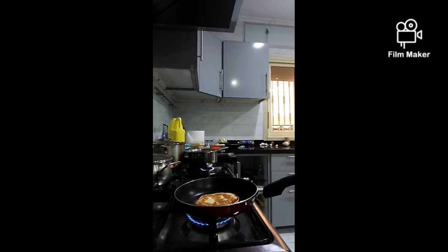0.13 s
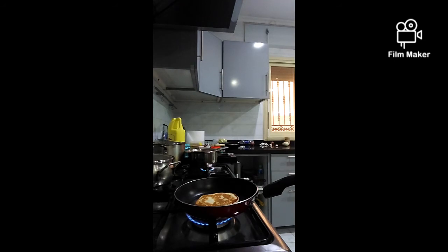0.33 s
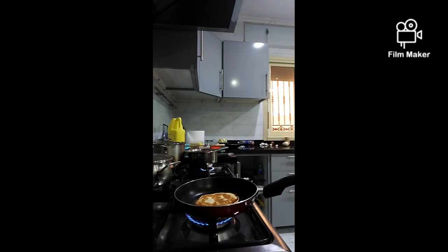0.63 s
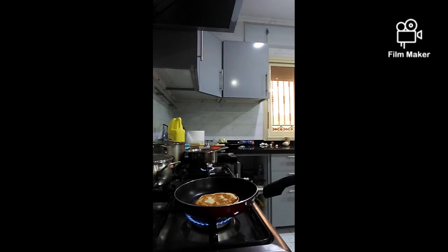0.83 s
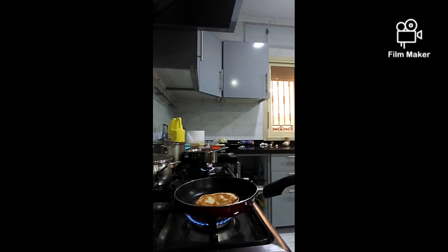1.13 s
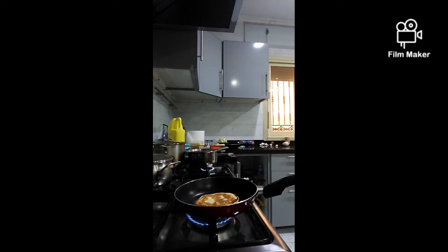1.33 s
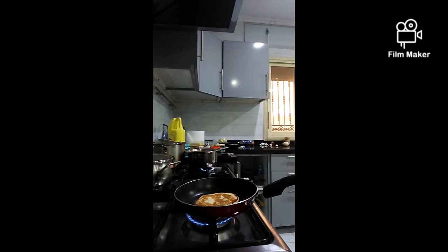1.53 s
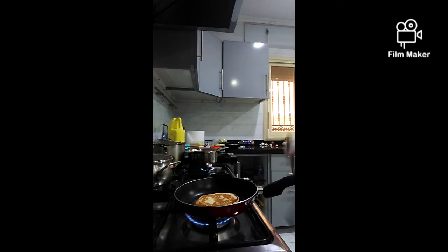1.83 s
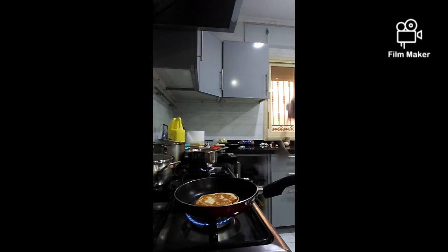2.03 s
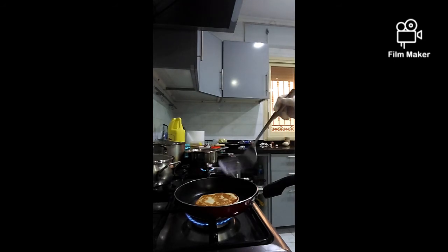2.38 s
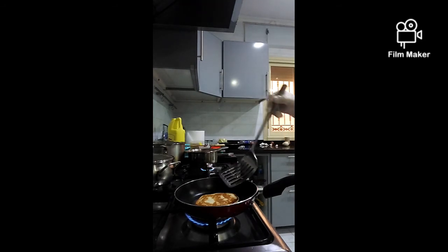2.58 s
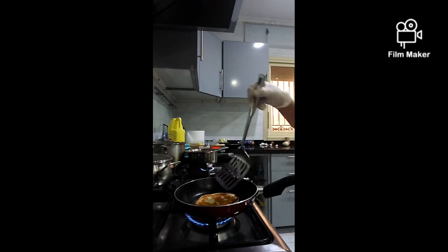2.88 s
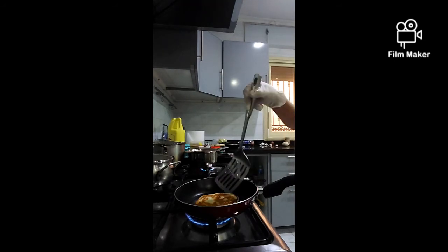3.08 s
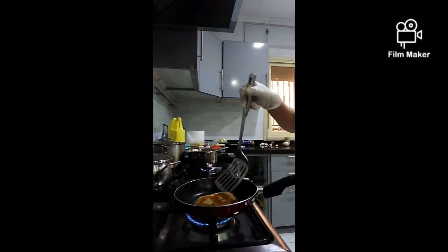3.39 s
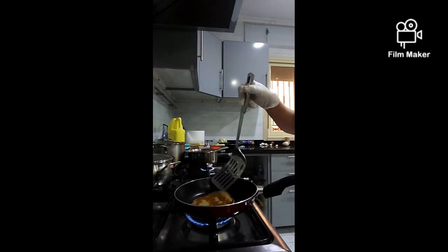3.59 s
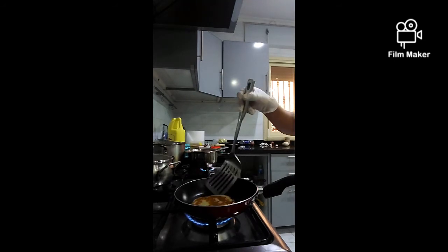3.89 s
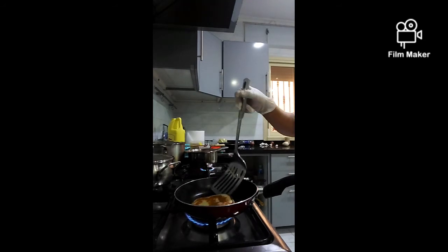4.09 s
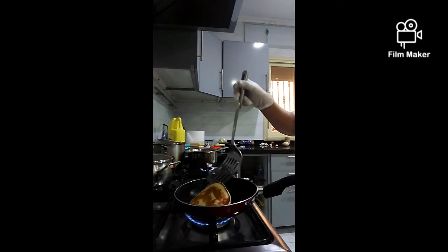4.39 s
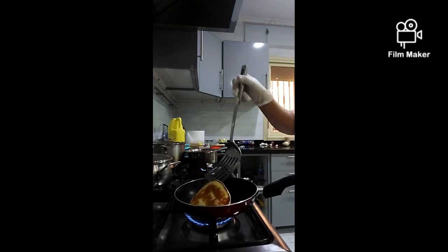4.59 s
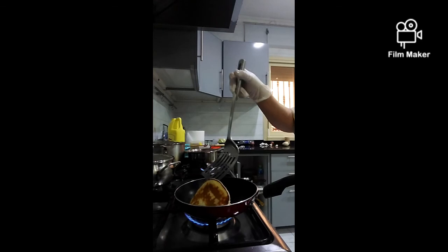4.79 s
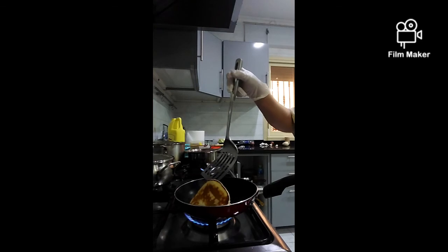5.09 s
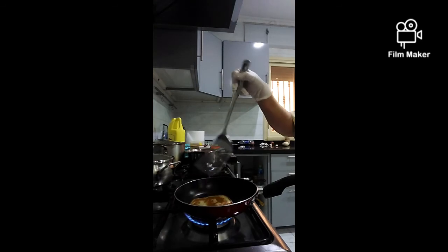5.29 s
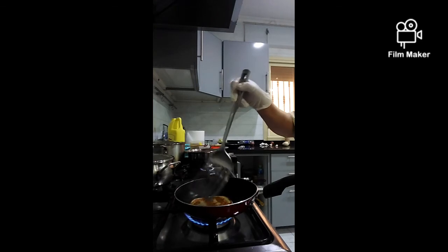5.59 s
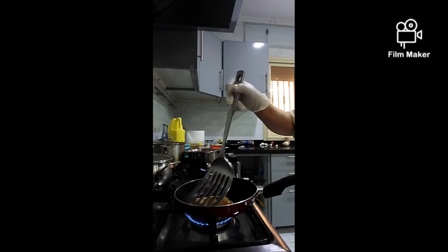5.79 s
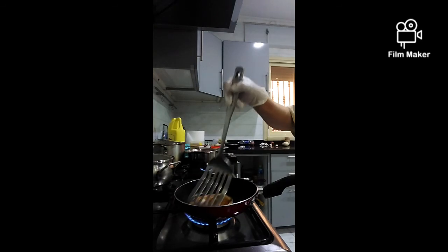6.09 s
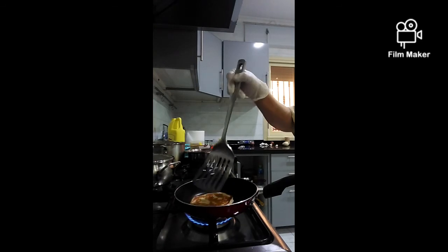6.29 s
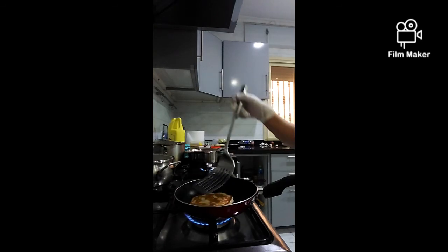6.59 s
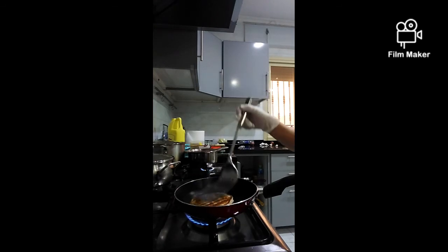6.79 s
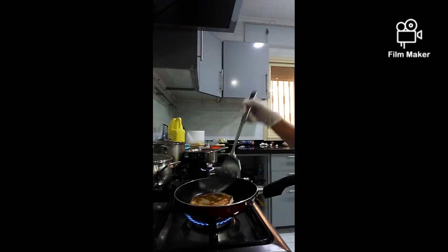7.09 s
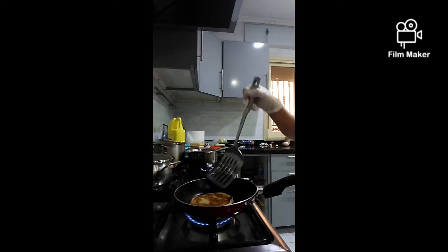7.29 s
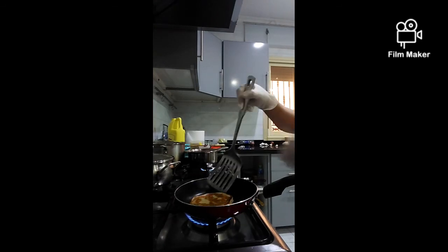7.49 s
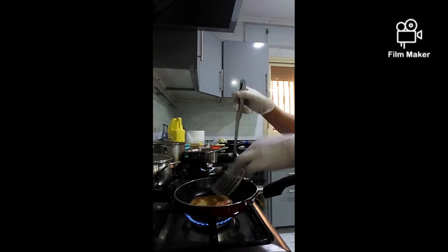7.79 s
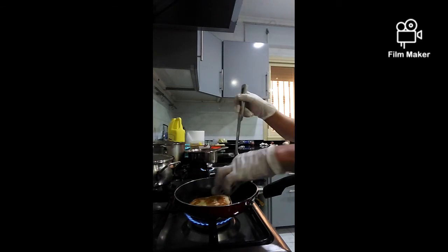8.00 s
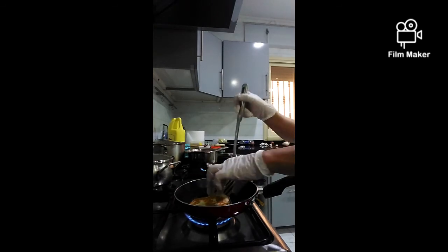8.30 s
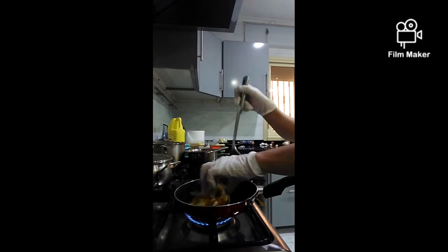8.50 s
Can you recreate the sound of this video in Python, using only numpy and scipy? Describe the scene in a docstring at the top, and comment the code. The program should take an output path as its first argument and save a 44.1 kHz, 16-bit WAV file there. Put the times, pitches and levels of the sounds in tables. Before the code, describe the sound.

A deep, slightly wavering extractor drone dominates, with faint frying hiss beneath. A metal spatula knocks a thin pan in small groups, its ring quickly damped, with one short squeak at about four seconds. A complete half-second dropout follows. Afterwards come a few light contacts, a long stretch of hum, then quick knocks and scrapes as fat flares into a crisp hiss. Heard close by on a phone in a hard-walled little kitchen.

```python
"""A cooker hood roars over a faint simmer of fat in a small tiled kitchen while a pancake fries.
The hood is turbulent noise shaped by resonances; the fat is a dense random train of bursting bubbles.
A slotted steel turner then taps, squeaks on and scrapes the pan: blows and slips excite decaying modes.
Fat sizzles up at the end. A phone close by hears all this through two unequal ports, and goes silent
for about half a second in the middle."""
import sys
import numpy as np
from scipy import signal
from scipy.fft import rfft, irfft, next_fast_len
from scipy.io import wavfile
from scipy.ndimage import uniform_filter1d

SR = 44100
rng = np.random.default_rng(int(sys.argv[2]) if len(sys.argv) > 2 else 0)


def dump_mix(stems):
    """Bounce the given channels to the path in sys.argv[1] as a 16-bit WAV at rate SR."""
    frames = np.atleast_2d(stems).T  # one column per channel
    limited = np.clip(frames, -1, 1)  # hard clip at full scale
    pcm = np.round(limited * 32767).astype(np.int16)
    wavfile.write(sys.argv[1], SR, pcm)


N = 380583  # samples
SIZE = next_fast_len(N)
HZ = np.maximum(np.arange(SIZE // 2 + 1) * SR / SIZE, 1)  # frequency of each Fourier bin

# Kitchen and duct resonances rung by the hood's air noise.
# Each row: centre in Hz, width in Hz, relative peak level in dB.
RESONANCES = [(64, 7.3, -41.5), (95.9, 8.9, -39.5), (115.4, 13, -37.5), (126, 18.3, -34.5),
              (142.2, 9, -34.5), (171, 12, -59.5), (199.7, 9.6, -41), (226.4, 3.6, -43), (255.5, 23.2, -41),
              (298.5, 19.5, -41), (342, 16, -54.5), (399.7, 12, -48.5), (429, 61, -48.5),
              (472.3, 39.5, -46), (490, 14, -60), (527, 15, -52), (590.5, 7.9, -51.5), (610.3, 11, -52),
              (647, 76, -60), (705.2, 11.3, -51.5), (794.3, 23, -56), (972, 7, -58.5), (1054, 73, -62),
              (1544, 37, -70), (2312, 175, -70.5), (3393, 300, -78)]
# Broad air rush between the resonances. Each row: frequency in Hz, level in dB on the same relative scale.
AIR_RUSH = [(25, -78.5), (50, -57.5), (160, -61), (500, -56.5), (880, -65), (1300, -68.5), (1900, -74.5),
            (2900, -80.5), (4000, -81.5), (4600, -94), (7000, -101.5), (11000, -108), (16000, -114)]
# Correlation of left and right in the hood's sound. Each row: frequency in Hz, correlation from 0 to 1.
LIKENESS = [(150, .9995), (300, .99), (500, .97), (700, .85), (900, .5), (1500, .4), (3000, .25),
            (6000, .2)]
# Phase by which the hood's sound at the left port trails the right. Each row: frequency in Hz, lag in radians.
LEFT_LAG = [(100, 0), (430, .15), (780, .9), (1300, 2.6), (2400, 7), (16000, 20)]
HOOD_DB, HOOD_FLICKER_DB = -29, 1.51  # rms level; rms wavering of each octave band

# Fat simmering round the pancake. Each row: time in seconds, level in dB.
SIMMER_LEVEL = [(0.05, -69.5), (.7, -71), (1.7, -75), (3.25, -71), (4.4, -74.5), (5.7, -71.5), (6.02, -69),
                (6.5, -84.5), (7.4, -86)]
# Spectrum of the simmer. Each row: frequency in Hz, relative level in dB.
SIMMER_TONE = [(2500, -32), (4000, 2.5), (5500, -1), (8000, -4), (12000, -12), (16000, -14.5)]
# Fat flaring up under the turner. Each row: time in seconds, level in dB.
FLARE_LEVEL = [(7.62, -53.5), (7.8, -52), (7.97, -51), (8.1, -51), (8.2, -55), (8.32, -49), (8.47, -56),
               (8.6, -53)]
# Spectrum of the flare. Each row: frequency in Hz, relative level in dB.
FLARE_SPECTRUM = [(1200, -8), (2300, -4), (3200, -2), (4000, -6.5), (5000, -10.5), (6500, -11.5),
                  (8500, -16.5), (12000, -24), (16000, -23.5)]
SIMMER_FLICKER_DB, FLARE_FLICKER_DB = 2.5, 1.2  # rms
FLARE_STARTS_S, FLARE_SWELL_S = 7.575, .05
BUBBLES_PER_S, BUBBLE_SCATTER_DB = 1200, 1.5  # mean rate in each channel; mean excess over the smallest

# Modes of the pan. Each row: frequency in Hz, level in dB relative to its region, free t60 in seconds.
PAN_MODES = [(788, 0, .08), (885, -6, .07), (968, 0, .11), (1075, -2, .08), (1400, -12, .06),
             (1465, 0, .08), (1520, -4, .07), (1575, 0, .08), (1705, -7, .06), (1785, -6, .07),
             (2280, -4, .07), (2405, 0, .09), (2550, 0, .08), (2960, -7, .05), (3350, 0, .05),
             (3570, -1, .05), (3870, -7, .04)]
# Where a touch lands decides how strongly each region of modes answers. Each entry: region centre in Hz.
REGION_CENTRES_HZ = [788, 968, 1460, 1575, 2400, 2550, 3500]
MODE_SCATTER_DB, MODE_DETUNE = 1.5, .004  # standard deviations from touch to touch; detune is a share
RING_FREEDOM = .85  # share of the free ring time left under the blade
# Turner meets the pan. Each row: start in seconds, crack level in dB, crack tilt in dB per octave,
# chatter t60 in seconds, then ring level in dB in each of the seven regions.
BLOWS = [(2.564, -57, -2, .1, -51, -46, -54, -53, -58, -59, -60),
         (2.576, -61, -2, .04, -58, -50, -50, -43, -57, -61, -62),
         (2.584, -57, -2, .12, -50, -40, -51, -54, -51, -57, -56),
         (2.678, -60, 2, .2, -62, -60, -57, -57, -62, -64, -66),
         (2.848, -55, -1, .07, -60, -58, -58, -56, -60, -62, -60),
         (3.15, -68, -3, .09, -56, -54, -62, -62, -62, -64, -66),
         (3.18, -58, -4, .12, -60, -60, -62, -62, -60, -62, -62),
         (3.19, -66, -4, .07, -50, -51, -48, -51, -58, -62, -64),
         (3.202, -64, -4, .12, -47, -50, -52, -50, -58, -62, -64),
         (3.725, -68, -4, .15, -47, -43, -62, -55, -60, -60, -70),
         (3.855, -52, -3, .1, -49, -40, -48, -43, -50, -45, -51),
         (5.115, -67, 0, .006, -70, -70, -72, -72, -70, -70, -70),
         (5.205, -64, -4, .11, -68, -68, -70, -70, -66, -68, -66),
         (5.87, -72, -8, .015, -42, -43, -36, -38, -56, -62, -53),
         (5.878, -76, -8, .05, -44, -44, -47, -42, -49, -59, -64),
         (7.466, -63, -3, .2, -60, -44, -58, -54, -60, -68, -68),
         (7.547, -50, -3, .08, -53, -52, -47, -42, -51, -46, -51),
         (7.559, -58, -3, .08, -54, -40, -39, -46, -58, -51, -52),
         (7.597, -66, -6, .13, -48, -43, -49, -48, -53, -56, -59)]
# Spectrum of the crack. Each row: frequency in Hz, relative level in dB.
CRACK_SPECTRUM = [(150, -70), (2500, -28), (3400, -14), (4200, -2), (6100, -1), (8000, -3), (10500, -6),
                  (13000, -10.5), (16000, -13)]
CHATTER_SHARE, CHATTER_SCATTER_DB = .39, 3.7  # share of samples with a contact; mean excess over the smallest
BLOW_SHARE = .7  # size of the first blow against all the chatter
# The edge slides over the pan.
# Each row: start in seconds, length in seconds, then ring level in dB in each of the seven regions.
STROKES = [(3.99, .04, -68, -60, -60, -54, -66, -70, -70), (7.648, .03, -60, -46, -52, -53, -59, -62, -64),
           (7.668, .038, -50, -40, -49, -39, -50, -54, -57),
           (7.703, .053, -41, -45, -44, -40, -51, -53, -60),
           (7.903, .05, -51, -47, -55, -51, -66, -66, -64),
           (8.262, .026, -64, -51, -64, -50, -64, -66, -64)]
SLIPS_PER_S, SLIP_SCATTER_DB = 3100, 1.6
# The edge catches and squeaks once.
# The row: start in seconds, length in seconds, level in dB, slips per second at start, then at end.
SQUEAK_STROKE = (4.024, .042, -40, 1520, 1620)
SQUEAK_WAVER, SQUEAK_WAVER_DB = .012, 2.5  # rms share of the pitch; rms level

# Hob, worktop and wall throw the pan's sound back at once, more to the right port, which faces away.
NEAR_T60_S, RIGHT_LATE_S = .03, .00016
DIRECT_DB, NEAR_DB = [[1], [-2]], [[-13], [-6]]  # left, right
ROOM_T60_S, ROOM_DB, ROOM_DAMP_HZ = .3, -9, 8000

# Response of the phone's ports. Each row: frequency in Hz, left minus right in dB.
PORT_DIFFERENCE = [(170, 0), (240, 2), (320, 4), (450, 1), (600, 7), (720, 11), (900, 2), (1500, 6),
                   (2400, 7), (3500, 11), (4100, 7), (4600, 0), (16000, 0)]
LOW_CUT_HZ, TOP_HZ = 30, 15750
SILENT_FROM_S, SILENT_TO_S = 4.5345, 5.0905


def undb(db):
    """Amplitude ratio from decibels."""
    return 10 ** (np.asarray(db) / 20)


def along(table, hz=HZ):
    """Interpolate (Hz, value) rows on a logarithmic frequency axis."""
    table_hz, value = np.transpose(table)
    return np.interp(np.log(hz), np.log(table_hz), value)


def colour(x, gain):
    """Linear filtering: multiply the spectrum by a gain."""
    return irfft(rfft(x, SIZE) * gain, SIZE)[..., :N]


def unit(x):
    """Normalise to rms 1."""
    return x / np.sqrt(np.mean(x ** 2))


def burst(x):
    """Normalise to the energy of 20 ms at rms 1."""
    return x * np.sqrt(.02 * SR / np.sum(x ** 2, axis=-1, keepdims=True))


def walk(rate):
    """Slow random modulation: levels held 1 / rate s, smoothed twice, at rms 1."""
    hold = int(SR / rate)
    steps = np.repeat(rng.standard_normal(N // hold + 1), hold)
    smooth = uniform_filter1d(uniform_filter1d(steps, hold), hold)
    return unit(smooth[:N])


def clicks(share, scatter_db, size):
    """Random impulse train: single-sample contacts of either sign, mostly small, a few large."""
    chance, sign, height = rng.random((3, size))
    height_db = -scatter_db * np.log(height + 1e-9)
    return (chance < share) * np.sign(sign - .5) * undb(height_db)


def add(track, s, sound):
    """Superpose a sound on the track from s seconds on."""
    start = int(s * SR)
    track[start:start + len(sound)] += sound[:N - start]


def hood():
    """Turbulence as broadband noise excites resonances; octave bands waver, treble differs left and right."""
    power = undb(along(AIR_RUSH)) ** 2
    for centre, width, db in RESONANCES:
        power = power + (undb(db) / (1 + ((HZ - centre) / width) ** 2 * 2)) ** 2
    # mixing a shared and an opposed noise sets the correlation of the pair
    same = np.clip(along(LIKENESS), 0, 1)
    mid, side = rfft(rng.standard_normal((2, SIZE)))
    shared, opposed = np.sqrt(1 + same) * mid, np.sqrt(1 - same) * side
    pair = np.array([shared + opposed, shared - opposed]) * np.sqrt(power)
    pair[0] *= np.exp(-1j * along(LEFT_LAG))
    octave = np.clip(np.log2(HZ / 60), 0, 8)
    out = 0
    for k in range(9):
        overlap = np.clip(1 - np.abs(octave - k), 0, 1)  # triangular bands that sum to one
        band = irfft(pair * overlap, SIZE)[:, :N]
        out = out + band * undb(HOOD_FLICKER_DB * walk(6))
    return unit(out) * undb(HOOD_DB)


def frying(level, tone, flicker_db):
    """Dense bubble bursts, smeared by the kitchen into a hiss (added noise), independent in each channel."""
    s, db = np.transpose(level)
    pops = np.array([clicks(BUBBLES_PER_S / SR, BUBBLE_SCATTER_DB, size=N) for _ in range(2)])
    hiss = unit(pops) + 1.1 * rng.standard_normal((2, N))
    hiss = unit(colour(hiss, undb(along(tone))))
    level_db = np.interp(np.arange(N) / SR, s, db)
    return hiss * undb(level_db + flicker_db * walk(25))


def simmer():
    """Gentle boiling: a faint hiss that dies down once the pancake is turned."""
    return frying(SIMMER_LEVEL, SIMMER_TONE, SIMMER_FLICKER_DB)


def flare():
    """Vigorous boiling: a loud hiss that swells in linearly over 50 ms."""
    swell = np.clip((np.arange(N) / SR - FLARE_STARTS_S) / FLARE_SWELL_S, 0, 1)
    return swell * frying(FLARE_LEVEL, FLARE_SPECTRUM, FLARE_FLICKER_DB)


def crack(push, tilt_db):
    """Contact spectrum: the blade's short dense clatter; each touch has its own brightness, set by its tilt."""
    hz = np.maximum(np.arange(len(push) // 2 + 1) * SR / len(push), 1)
    gain = undb(along(CRACK_SPECTRUM, hz) + tilt_db * np.log2(hz / 6000))
    delayed = np.roll(push, SR // 200)  # 5 ms of room for the filter's rise before the blow
    return burst(irfft(rfft(delayed) * gain, len(push)))


def ring(push, regions_db):
    """Modal superposition: a push excites damped sinusoids; the resting blade shortens their decay."""
    t = np.arange(len(push)) / SR
    hz, db, t60 = np.transpose(PAN_MODES)[:, :, None]
    region_db = np.interp(np.log(hz), np.log(REGION_CENTRES_HZ), regions_db)
    db = db + region_db + MODE_SCATTER_DB * rng.standard_normal(hz.shape)
    detune = 1 + MODE_DETUNE * rng.standard_normal(hz.shape)
    modes = np.sin(2 * np.pi * hz * detune * t) * 1000 ** (-t / (t60 * RING_FREEDOM))
    modes *= 1 - np.exp(-t / .001)  # rise with a time constant of 1 ms
    modes *= (-1) ** np.arange(len(PAN_MODES))[:, None]  # neighbours swing opposite ways
    answers = irfft(rfft(modes) * rfft(push), len(t))
    return np.sum(undb(db) * burst(answers), axis=0)


def chatter(t, t60):
    """Impact: one blow, then a train of contacts that decays exponentially."""
    push = clicks(CHATTER_SHARE, CHATTER_SCATTER_DB, size=len(t)) * 1000 ** (-t / t60)
    push[0] = BLOW_SHARE * np.sqrt(np.sum(push ** 2))
    return push


def scrape(t, length):
    """Irregular friction: a random train of slips under the stroke's rounded envelope."""
    stroke = np.sin(np.pi * np.clip(t / length, 0, 1)) ** .5
    return clicks(SLIPS_PER_S / SR, SLIP_SCATTER_DB, size=len(t)) * stroke


def squeak(t):
    """Nearly regular stick-slip, heard as one unsteady tone that rises through the stroke."""
    _, length, db, start_hz, end_hz = SQUEAK_STROKE
    share = np.clip(t / length, 0, 1)
    glide_hz = start_hz + (end_hz - start_hz) * share
    hz = glide_hz * (1 + SQUEAK_WAVER * walk(300)[:len(t)])
    stroke = np.sin(np.pi * share) ** .5 * undb(SQUEAK_WAVER_DB * walk(150)[:len(t)])
    return undb(db) * burst(stroke * np.sin(2 * np.pi * np.cumsum(hz) / SR))


def turner():
    """Impact and friction as forces: taps crack and ring the pan, scrapes ring it, and one stroke squeaks."""
    out, t = np.zeros(N), np.arange(8192) / SR
    for s, crack_db, tilt_db, t60, *regions_db in BLOWS:
        push = chatter(t, t60)
        add(out, s - 1 / 200, undb(crack_db) * crack(push, tilt_db))  # undoes the crack's 5 ms delay
        add(out, s, ring(push, regions_db))
    for s, length, *regions_db in STROKES:
        add(out, s, ring(scrape(t, length), regions_db))
    add(out, SQUEAK_STROKE[0], squeak(t))
    return out


def echoes(t60, db):
    """Diffuse reverberation: the spectrum of exponentially decaying noise, independent in each channel."""
    t = np.arange(SR // 2) / SR
    tail = rng.standard_normal((2, len(t))) * 1000 ** (-t / t60)
    tail *= np.clip(t / .001, 0, 1)  # 1 ms rise
    return undb(db) * rfft(tail / np.sqrt(np.sum(tail ** 2, axis=1, keepdims=True)), SIZE)


def kitchen(x):
    """Room response: direct sound, close reflections and a duller diffuse tail."""
    late_s = RIGHT_LATE_S * np.array([[0], [1]])
    direct = undb(DIRECT_DB) * np.exp(-2j * np.pi * HZ * late_s)
    near = echoes(NEAR_T60_S, NEAR_DB)
    room = echoes(ROOM_T60_S, ROOM_DB) / (1 + 1j * HZ / ROOM_DAMP_HZ)
    return colour(x, direct + near + room)


def scene():
    """Superposition of the hood, the fat and the turner in the kitchen."""
    return hood() + simmer() + flare() + kitchen(turner())


def record(dry):
    """Reception: unequal ports colour each side, both ends of the band are cut, and the sound drops out once."""
    sides = colour(dry, undb(along(PORT_DIFFERENCE) * np.array([[.5], [-.5]])))
    low_cut = signal.butter(2, LOW_CUT_HZ, "high", fs=SR, output="sos")
    top_cut = signal.ellip(10, .2, 80, TOP_HZ, fs=SR, output="sos")
    sides = signal.sosfilt(top_cut, signal.sosfilt(low_cut, sides))
    t = np.arange(N) / SR
    outside_s = np.maximum(SILENT_FROM_S - t, t - SILENT_TO_S)  # distance from the silence
    return sides * np.clip(outside_s / .001, 0, 1)  # 1 ms fades


dry = scene()
out = record(dry)
dump_mix(out)
```